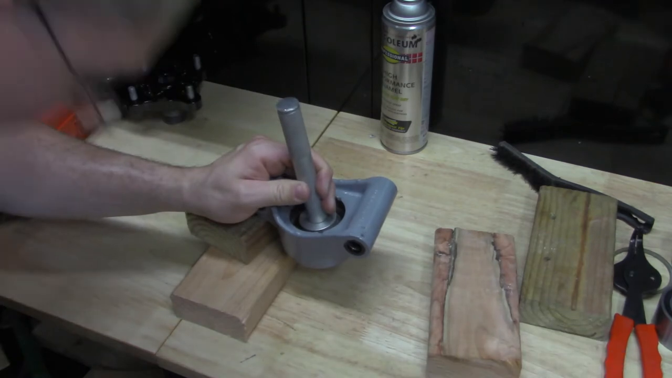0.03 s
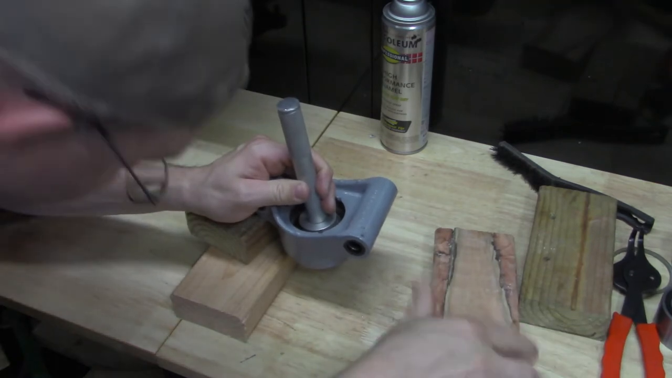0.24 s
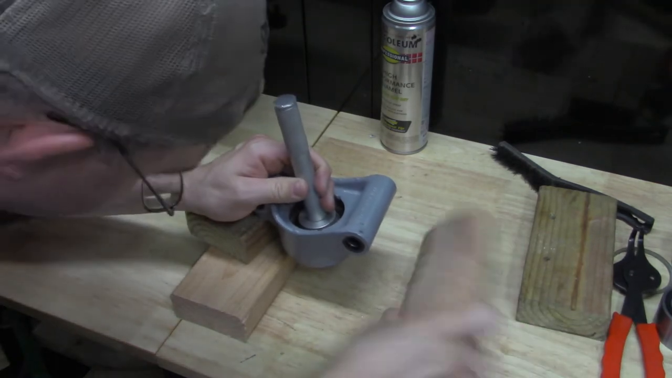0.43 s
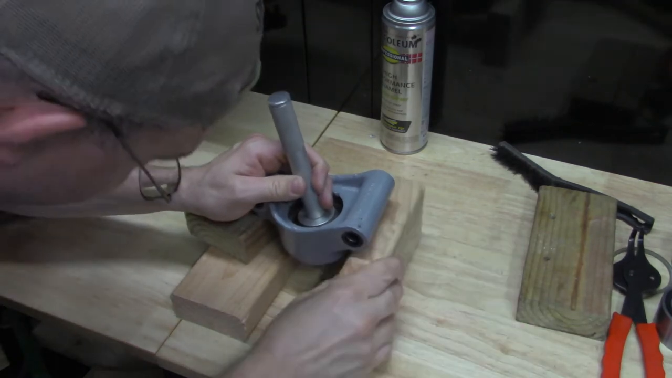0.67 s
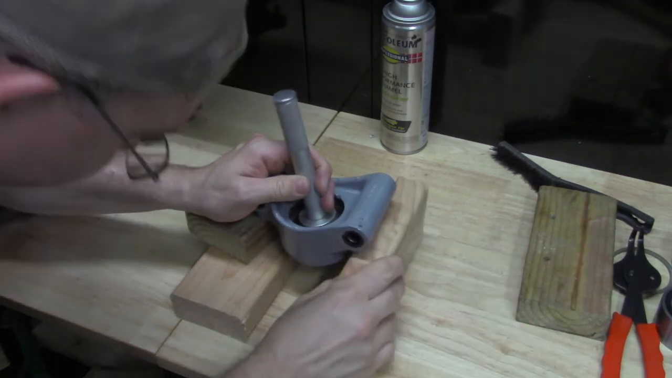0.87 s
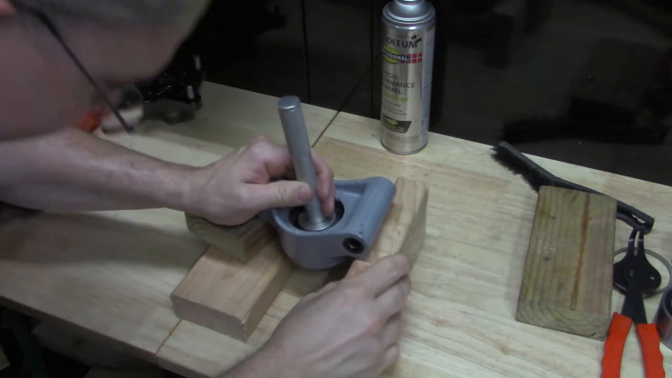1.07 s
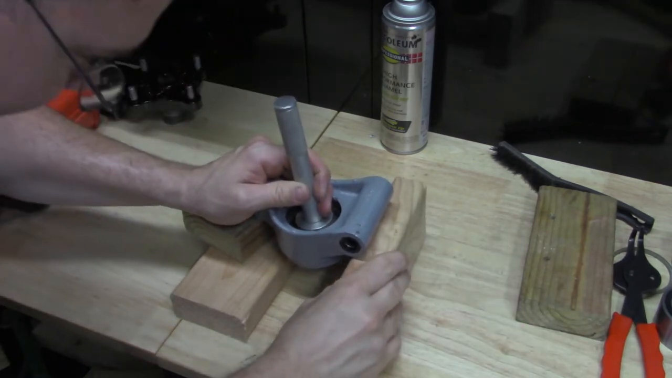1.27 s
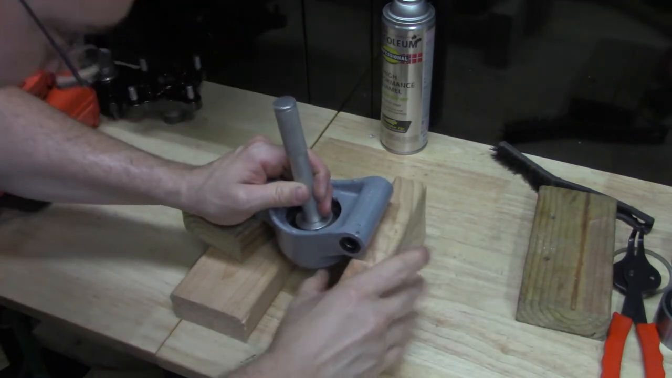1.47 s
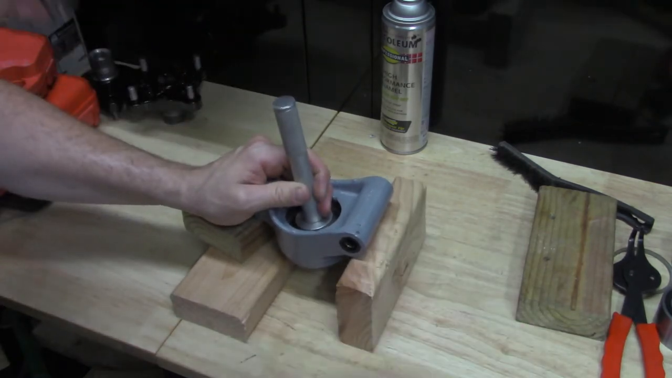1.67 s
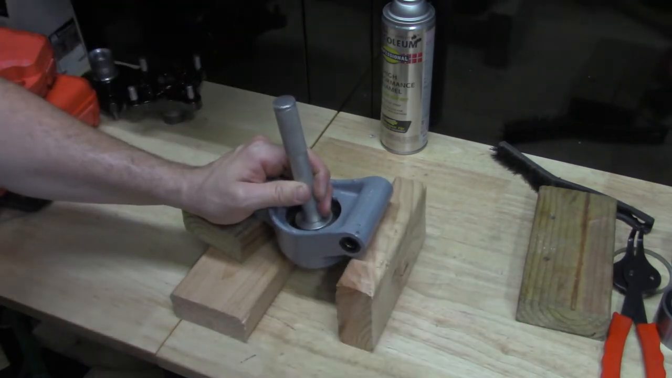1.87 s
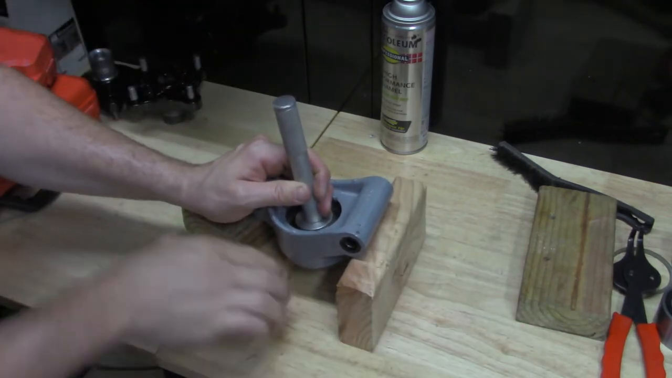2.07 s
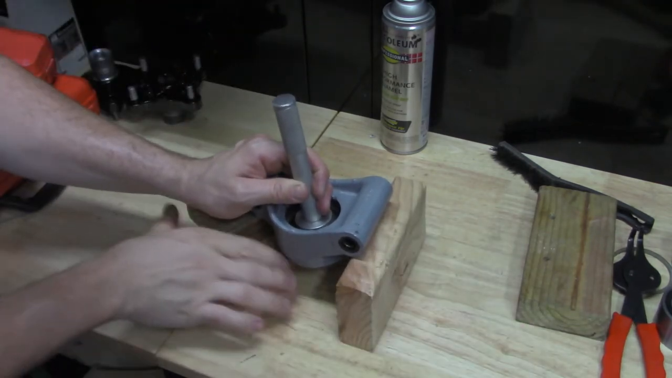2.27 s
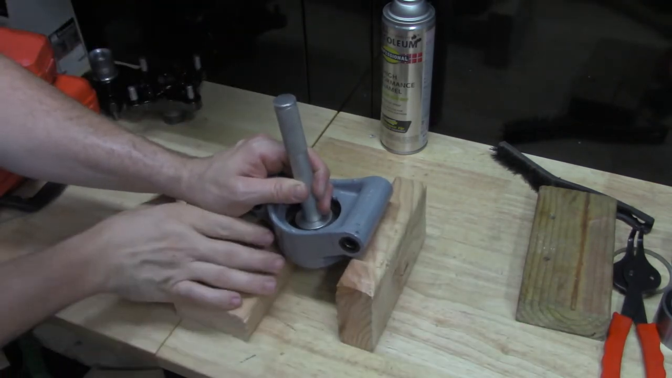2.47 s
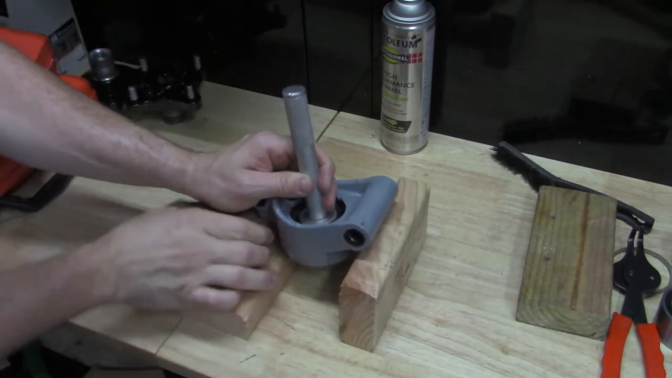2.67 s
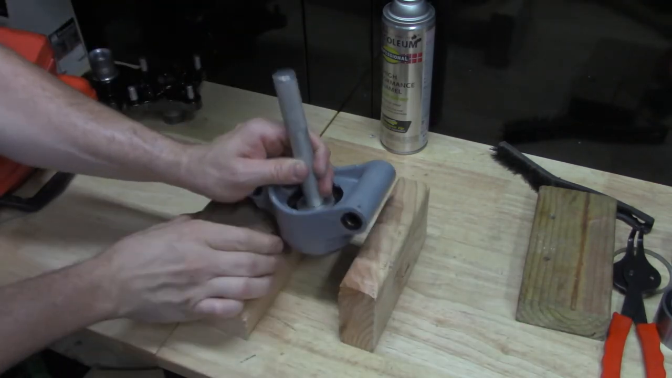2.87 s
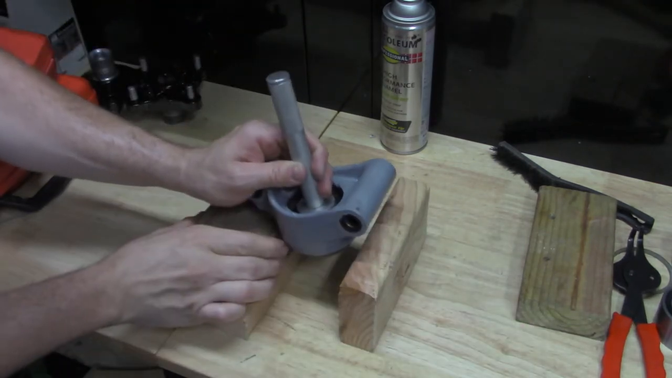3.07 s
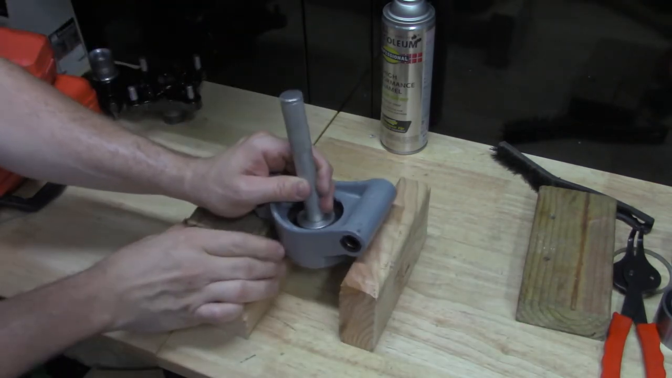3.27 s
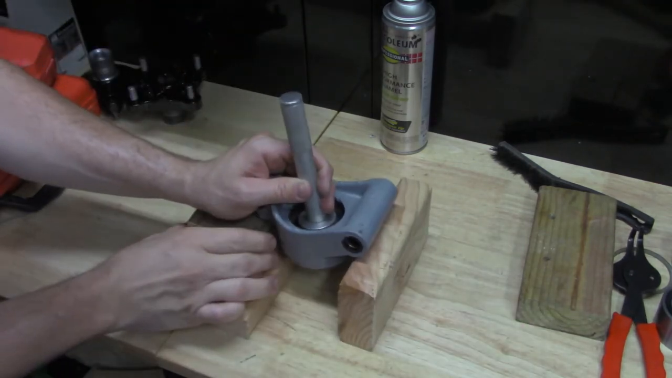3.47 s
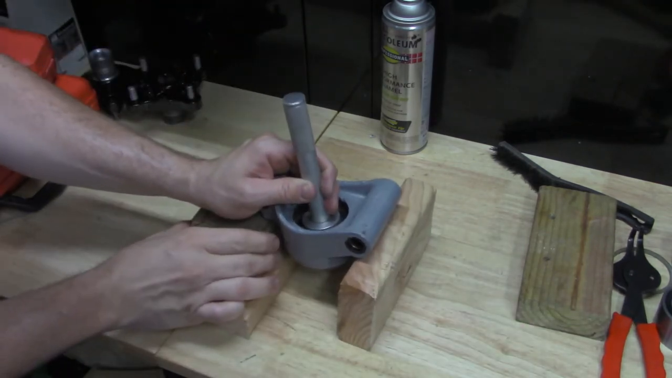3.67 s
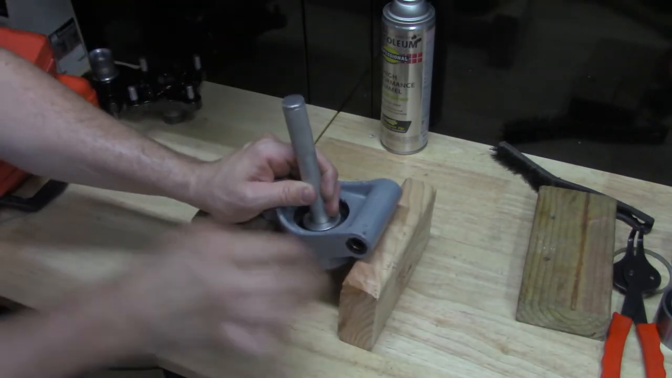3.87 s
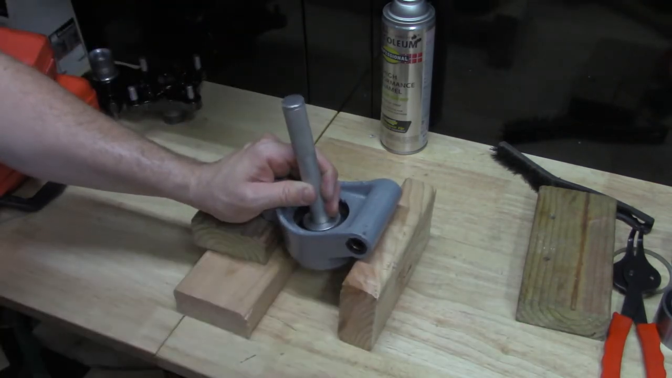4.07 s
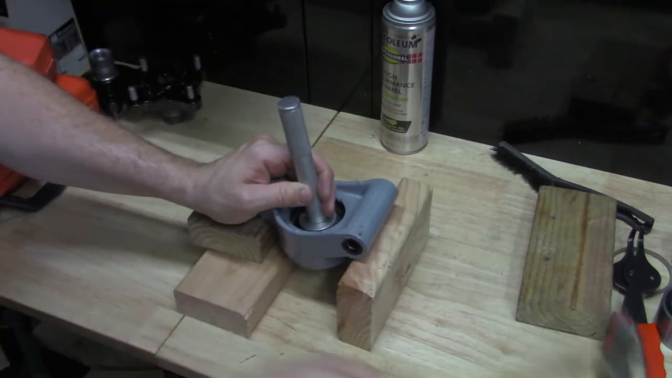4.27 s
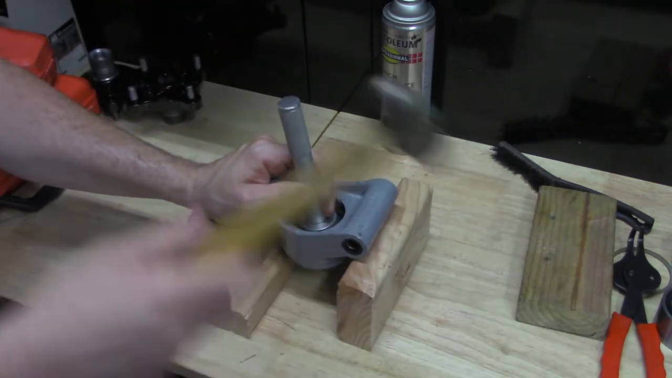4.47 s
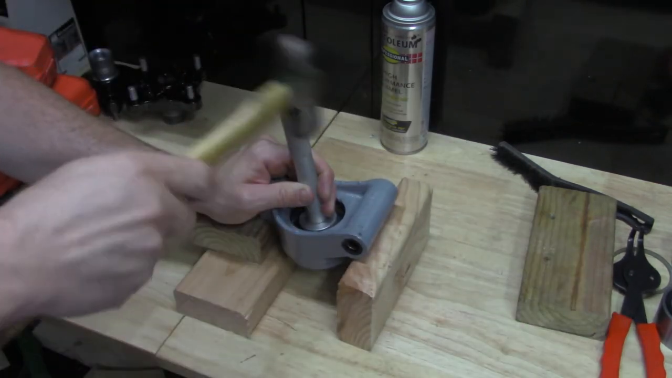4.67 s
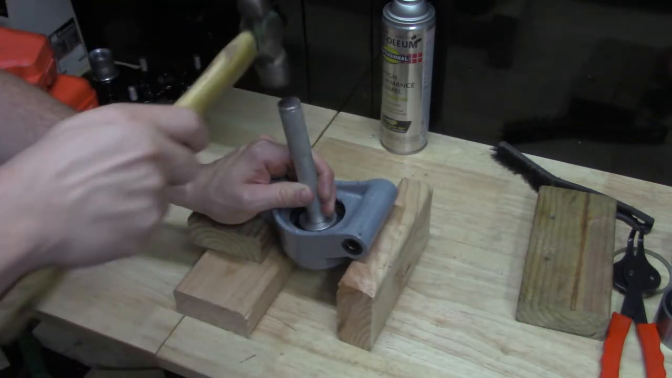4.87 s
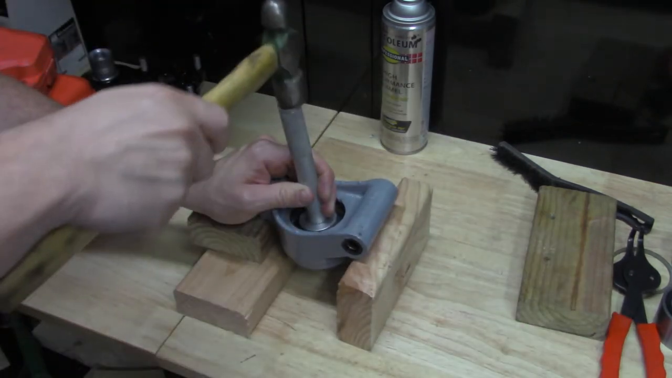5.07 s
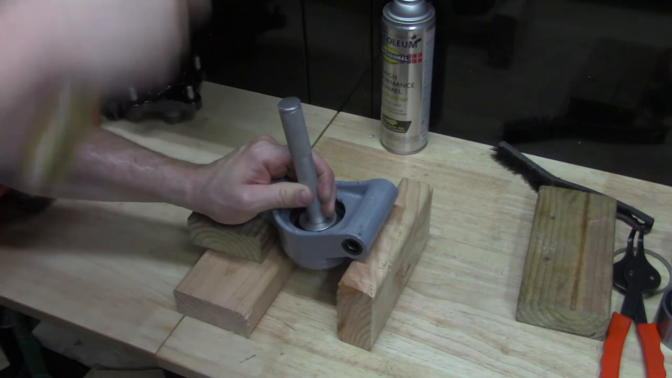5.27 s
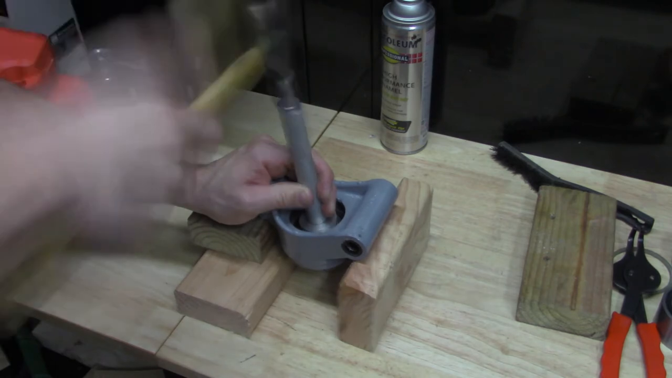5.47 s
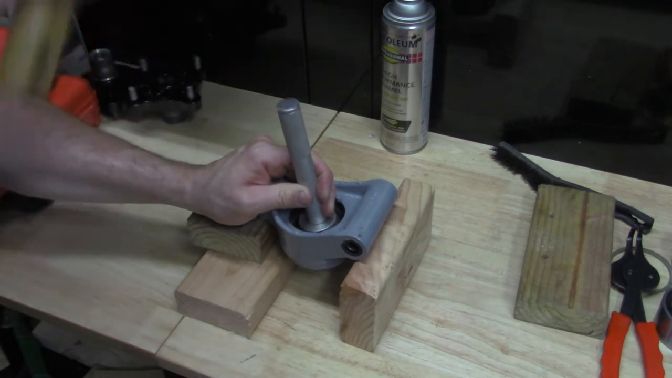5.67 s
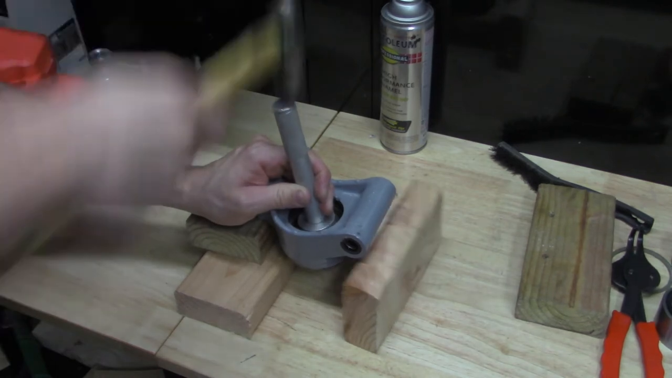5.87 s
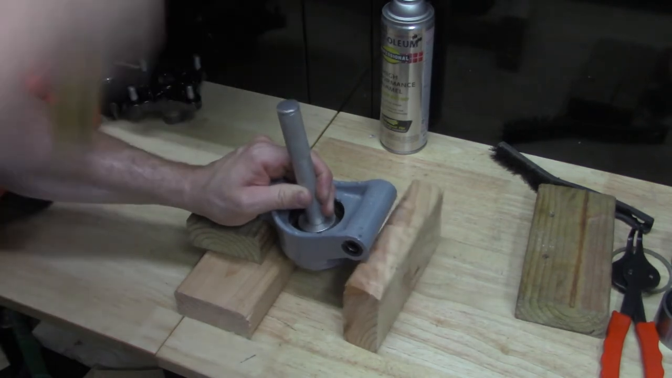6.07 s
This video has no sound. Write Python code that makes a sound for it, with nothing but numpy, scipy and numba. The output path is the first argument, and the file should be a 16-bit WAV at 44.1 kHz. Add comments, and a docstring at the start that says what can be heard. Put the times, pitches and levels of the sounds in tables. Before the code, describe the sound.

Close, slightly dull stereo, louder on the left: a rapid clatter of wood on a bench, hollow knocks, quiet rubbing, another sharp wooden clunk. After a near pause over airy hum, steel hits steel: one light tink, then two explosive blows, distorted and abruptly squashed, each followed by rattling wooden rebounds and a short, swelling workshop echo.

```python
"""Wooden blocks are set down, nudged and slid on a workbench to prop up a cast metal housing: filtered bursts and modes.
Then a hammer strikes a steel drift in its bearing, one light blow and two heavy: a noise crack plus ringing modes.
After each heavy blow the blocks hop and land again, ever sooner and weaker. Ventilation noise and hum run throughout.
The blows overload a nearby camera; its gain control ducks and, recovering, swells the workshop's echo."""
import sys
import numpy as np
from scipy import signal
from scipy.fft import rfft, irfft, next_fast_len
from scipy.io import wavfile
from scipy.ndimage import map_coordinates
from numba import njit

SR = 44100
rng = np.random.default_rng(int(sys.argv[2]) if len(sys.argv) > 2 else 0)


def file_out(sig):
    """Save sig as 16-bit WAV at sys.argv[1]."""
    # one column per channel
    cols = np.atleast_2d(sig).T
    # limit, then scale
    lim = np.clip(cols, -1, 1)
    pcm = np.round(lim * 32767).astype(np.int16)
    wavfile.write(sys.argv[1], SR, pcm)


N = 269892

# bench top with the blocks on it, modes: (frequency [Hz], level [dB], t60 [s])
BENCH_MODES = [(51.7, -22, 0.27), (117, -4, 0.2), (247, -18, 0.17), (388, -4, 0.088), (580, -3, 0.067),
               (738, -3.5, 0.065), (789, -3.5, 0.05), (987, -4, 0.062), (1134, -8, 0.14),
               (1175, -8.5, 0.045), (1480, -7.5, 0.065), (1465, -17, 0.043), (1900, -7.5, 0.012)]


def amp(db):
    """Decibels to gain."""
    return 10 ** (np.asarray(db) / 20)


def unit(x):
    """Scale to rms 1."""
    return x / np.sqrt(np.mean(x ** 2) + 1e-20)


def punch(x):
    """Scale to the energy of 10 ms at rms 1."""
    return x / np.sqrt(np.sum(x ** 2) * 100 / SR + 1e-20)


def along(points, hz):
    """Interpolate (Hz, value) points on a log frequency axis."""
    point_hz, value = np.transpose(points)
    return np.interp(np.log(hz + 1), np.log(point_hz), value)


def coloured(x, points):
    """Minimum-phase filter with the given (Hz, dB) gains, by folding the cepstrum."""
    half = next_fast_len(x.shape[-1] // 2 + 4096)
    gain = amp(along(points, np.fft.rfftfreq(2 * half, 1 / SR)))
    cepstrum = irfft(np.log(gain))
    cepstrum[1:half] *= 2
    cepstrum[half + 1:] = 0
    response = np.exp(rfft(cepstrum))
    return irfft(rfft(x, 2 * half) * response)[..., :x.shape[-1]]


def fade(t, t60):
    """Exponential decay of 60 dB in t60 seconds."""
    return np.exp(-np.log(1000) * t / t60)


def ring(modes, scatter_db, contact_s=0.00051):
    """Struck modes swell over the contact time and decay; mode levels scatter from strike to strike."""
    t = np.arange(SR // 2) / SR
    tones = np.zeros(len(t))
    for hz, db, t60 in modes:
        gain = amp(db + scatter_db * rng.normal())
        tones += gain * fade(t, t60) * np.sin(2 * np.pi * hz * t)
    return punch(tones * (1 - np.exp(-(t / contact_s) ** 2)))


def burst(spectrum, t60):
    """A contact spread in time by its path through the solid: random phases, smooth spectrum."""
    t = np.arange(SR // 2) / SR
    x = rng.standard_normal(len(t)) * fade(t, t60)
    for _ in range(6):  # alternate flat spectrum and short duration
        flat = irfft(np.exp(1j * np.angle(rfft(x))), len(t))
        x = flat * (t < t60)
    return punch(coloured(x, spectrum))


def diffuse(size):
    """Noise from all sides: alike at both microphones in the bass, nearly unrelated at the top."""
    # left-right likeness: (frequency [Hz], correlation [0-1])
    likeness = [(120, 0.97), (400, 0.24), (1200, 0.4), (3500, 0.45), (8000, 0.05)]
    a, b = rfft(rng.standard_normal((2, size)))
    correlation = np.clip(along(likeness, np.fft.rfftfreq(size, 1 / SR)), 0, 1)
    turn = np.arccos(correlation) / 2
    common, side = a * np.cos(turn), b * np.sin(turn)
    return irfft([common + side, common - side], size)


def workshop(x, echo_db, build_s=0.00053):
    """Direct sound plus a diffuse echo that builds up, then decays at its own rate in each band."""
    # reverberation time: (frequency [Hz], t60 [s])
    room_t60 = [(60, 1), (130, 0.26), (300, 0.61), (1000, 0.36), (3000, 0.29), (7000, 0.29), (14000, 0.2)]
    # echo spectrum: (frequency [Hz], level [dB])
    room_level = [(50, -3), (120, 4.5), (280, 2), (1000, 3.5), (5000, 0.5), (10000, 4), (15000, -12)]
    hz, t, z = signal.stft(diffuse(size=SR), SR, nperseg=256)
    t60 = along(room_t60, hz)[:, None]
    equal_energy = np.sqrt(2 * np.log(1000) / (t60 * SR))
    z = z * fade(t, t60) * amp(along(room_level, hz))[:, None] * equal_energy
    tail = signal.istft(z, SR, nperseg=256)[1][:, :SR]
    build_up = 1 - np.exp(-(np.arange(SR) / SR / build_s) ** 2)
    response = amp(echo_db) * tail * build_up
    response[:, 0] += 1  # direct sound
    return signal.fftconvolve(x[None], response, axes=1)


def add(track, s, x):
    """Mix x into the track at time s [s]."""
    part = track[:, max(round(s * SR), 0):][:, :x.shape[1]]
    part += x[:, :part.shape[1]]


def hammer():
    """Steel cracks on steel; the drift rings and drives the housing into the bench and its frame."""
    # hammer on the drift: (time [s], level [dB], housing ring [dB])
    blow_list = [(4.936, -3, -26), (5.47, 22, -8), (5.8132, 22, -12)]
    # steel on steel, spectrum: (frequency [Hz], level [dB per Hz])
    crack_spectrum = [(30, -7.5), (120, 3.5), (300, 0), (800, 1), (1500, 4.5), (3200, 1.5), (4300, -3),
                      (8300, -11), (9300, -13.5), (11000, -23), (16000, -15)]
    # steel drift held in the fingers, modes: (frequency [Hz], level [dB], t60 [s])
    drift_modes = [(2490, 15, 0.041), (3100, -5, .05), (4390, 10, 0.12), (4400, 7, 0.082), (4750, -1, 0.08),
                   (6050, 10, 0.023), (8650, -15, .05)]
    # cast housing and bearing, modes: (frequency [Hz], level [dB], t60 [s])
    housing_modes = [(1113, -9.5, 0.22), (1440, -11, 0.046), (1860, -17, 0.049), (2010, -18, 0.058),
                     (2290, 4, 0.009), (2750, -11, 0.022), (3123, 9.5, 0.016), (3486, 6, 0.02),
                     (7220, -7, 0.028), (8360, -15, 0.013)]
    # bench frame, shaken only by the hammer, modes: (frequency [Hz], level [dB], t60 [s])
    frame_modes = [(55.5, -8, 0.32), (97.8, -1, 0.63)]
    weight_db, bench_db, frame_db = 2.5, -9, -20.5
    bright_db, bright_slope = -4.5, 0.091  # top of the crack at level 0; harder is sharper [dB per dB]
    drift_db, drift_slope = -11, -0.54  # drift ring at level 0; harder seats and damps it [dB per dB]
    out = np.zeros((2, N))
    for s, db, housing_db in blow_list:
        tilt = [(600, weight_db), (1400, 0), (6500, 0.0082), (13000, bright_db + bright_slope * db)]
        blow = coloured(burst(crack_spectrum, t60=0.02), tilt)
        blow += amp(drift_db + drift_slope * db) * ring(drift_modes, scatter_db=1)
        blow += amp(housing_db) * ring(housing_modes, scatter_db=1)
        blow += amp(bench_db) * ring(BENCH_MODES, scatter_db=1)
        blow += amp(frame_db) * ring(frame_modes, scatter_db=4, contact_s=0.0025)
        add(out, s, workshop(amp(db) * blow, echo_db=-2.0, build_s=0.00057))
    return out


def knock(hardness_db, bass_db, note_hz, note_db):
    """One contact of wood on the bench: a clack, the bench's modes and the block's own note."""
    # wood on wood, spectrum: (frequency [Hz], level [dB per Hz])
    clack_spectrum = [(30, -15.5), (110, 1), (300, -2.5), (1000, -2.5), (2000, -12.5), (4000, -24),
                      (8000, -39.5), (15000, -83)]
    tilt = [(110, bass_db), (300, 4.5), (700, 3.5), (2000, hardness_db), (6000, hardness_db), (14000, 4)]
    wood = amp(-6.5) * ring(BENCH_MODES, scatter_db=0.0) + burst(clack_spectrum, t60=0.033)
    wood = punch(coloured(wood, tilt))
    note = ring([(note_hz, 0, 0.02)], scatter_db=0)  # t60 0.02 s
    return punch(wood + amp(note_db) * note)


def blocks():
    """Flat landings are dull and hollow, edge landings bright, gentle nudges mostly thud."""
    # wood set down or nudged: (time [s], level [dB], contact hardness [dB], block note [Hz], echo [dB])
    knock_list = [(.002, -3, -2.5, 1160, -2), (.007, -3.5, 6, 1720, 0.5), (.078, -3.5, 6.5, 1615, 1.5),
                  (.118, -4.5, 15.5, 1120, -1), (.124, -7.5, 7.5, 660, 1.5), (.166, -9.5, -1, 402, -1),
                  (.195, -11.5, -7, 415, -15), (0.283, -23, -1, 420, 6.5), (.506, -7, -3, 260, 0.5),
                  (.532, -19, -1, 745, -2.5), (.58, -10.5, 3, 2176, -8), (.664, -6.5, -8, 576, -11),
                  (.923, -14.5, -9.5, 280, -4.5), (.955, -20, -4, 810, -10), (1.75, -31, -4, 270, -2.5),
                  (2.619, -32.5, -16, 400, 0), (2.675, -28.5, -19, 550, -2.5), (3.19, -18.5, -6, 586, 2),
                  (3.221, -2.5, -10, 265, -5), (3.226, -8, 6.5, 440, -1), (3.59, -31.5, -22, 386, 0.5),
                  (4.05, -31, -24, 129, 2), (4.127, -30.5, -9, 920, -2.5), (4.1734, -12, -0.5, 540, -5),
                  (4.209, -25, 8, 1200, -6)]
    bass_db, bass_slope = -5.5, -0.62  # thud at level 0; gentler push more than click [dB per dB]
    note_db, note_slope = -5, -0.27  # note at hardness 0; hard edges excite it less [dB per dB]
    out = np.zeros((2, N))
    for s, db, hardness_db, note_hz, echo_db in knock_list:
        thud_db = bass_db + bass_slope * db
        contact = knock(hardness_db, thud_db, note_hz, note_db + note_slope * hardness_db)
        add(out, s, workshop(amp(db) * contact, echo_db))
    return out


def jolts(count=3):
    """Things thrown up by a heavy blow land and rebound, ever sooner and weaker."""
    # landings after the heavy blows: (first landing [s], level [dB], thud [dB])
    landings = [(5.565, 0, -2.5), (5.976, -4.5, 13)]
    hop_s, hop_shrink, hop_loss_db = .055, .7, 5  # first rebound, ratio of each to the last, loss a rebound
    out = np.zeros((2, N))
    for s, db, thud_db in landings:
        for k in range(count):
            contact = knock(hardness_db=-13.5, bass_db=thud_db, note_hz=620, note_db=-8)
            add(out, s, workshop(amp(db - hop_loss_db * k) * contact, echo_db=-5))
            s = s + hop_s * hop_shrink ** k
    return out


def scuffs(rough=0.26):
    """Wood and fingers slide: grain catches in tiny slips, hissing and rumbling the bench."""
    # strokes, relative levels: (middle [s], half length [s], hiss [dB], rumble [dB])
    strokes = [(0.448, 0.028, -38, -31.5), (0.654, .03, -40, -51), (0.95, 0.018, -43.5, -63),
               (2.158, 0.046, -50.5, -44), (2.238, 0.017, -48.5, -70), (2.392, 0.0089, -59, -74),
               (2.65, 0.39, -49.5, -40.5), (4.12, 0.078, -51, -40.5)]
    # hiss spectrum: (frequency [Hz], level [dB per Hz])
    rasp_spectrum = [(300, -25), (1500, 10), (4000, 10), (8000, 0), (11000, -13), (16000, -21)]
    # rumble spectrum: (frequency [Hz], level [dB per Hz])
    rumble_spectrum = [(30, -6), (130, 13.5), (550, -8), (1100, -8), (2500, -41), (6000, -31),
                       (16000, -110)]
    t = np.arange(N) / SR
    hiss, rumble = np.zeros(N), np.zeros(N)
    for s, half_length_s, hiss_db, rumble_db in strokes:
        stroke = np.exp(-((t - s) / half_length_s) ** 2)
        hiss += amp(hiss_db) * stroke
        rumble += amp(rumble_db) * stroke
    slips = rng.standard_normal((2, N)) * np.exp(rough * rng.standard_normal((2, N)))
    rubbing = hiss * unit(coloured(slips[0], rasp_spectrum))
    rubbing += rumble * unit(coloured(slips[1], rumble_spectrum))
    return workshop(amp(-1.0) * rubbing, echo_db=-6.5)[:, :N]


def background(air_db=-43, hum_db=-47, hum_hz=122, waver=0.14):
    """Steady diffuse ventilation noise with a hum wavering in level and phase."""
    # ventilation spectrum: (frequency [Hz], level [dB per Hz])
    air_spectrum = [(25, -16.5), (60, -4.5), (100, -9.5), (135, -4.5), (180, -13), (215, -22.5),
                    (260, -9.5), (330, -20.5), (600, -19.5), (2000, -22), (4500, -29.5), (8000, -39),
                    (11000, -42), (15800, -42)]
    t = np.arange(N) / SR
    # smooth random curves, 18 points a second
    in_phase, quadrature = (map_coordinates(rng.standard_normal(N // 100), [t * 18]) for _ in range(2))
    wavering = 1 + waver * (in_phase + 1j * quadrature)
    hum = unit(np.real(wavering * np.exp(2j * np.pi * hum_hz * t)))
    air = unit(coloured(diffuse(size=N), air_spectrum))
    air = coloured(air, [(100, 1.7), (400, 3.5), (3000, 1.55), (9000, -3.0)])  # air_db excludes this lift
    return amp(air_db) * air + amp(hum_db) * hum


def scene():
    """Everything at the bench; the drift stands a little more to the right than the blocks."""
    # right microphone, facing away from the bench: (frequency [Hz], gain [dB])
    shade = [(30, 3.5), (110, -5), (300, -8), (600, -11), (1500, -11), (3500, -8.5), (6000, -3.5),
             (10000, -2)]
    left, right = blocks() + jolts() + hammer() * amp([[0], [1.5]]) + scuffs() + background()
    return np.array([left, coloured(right, shade)])


@njit
def ducking(excess_db, attack_s, slew_db_per_s, release_db_per_s):
    """Gain reduction [dB]: closes at a limited slew, lets go at a steady rate."""
    cut, out = 0.0, np.zeros(len(excess_db))
    for i in range(len(excess_db)):
        if excess_db[i] > cut:
            cut += min((excess_db[i] - cut) / attack_s, slew_db_per_s) / SR
        else:
            cut = max(cut - release_db_per_s / SR, 0.0)
        out[i] = cut
    return out


def record(dry, limit_db=-5, attack_s=0.0011, slew_db_per_s=12000, recovery_db_per_s=190, ceiling=0.87):
    """The capsules overload on one side, gain control ducks too late, and the first milliseconds clip."""
    # the camera's dull top octave: (frequency [Hz], gain [dB])
    dull_top = [(8000, -0.5), (10500, -1), (13000, -2.5), (16000, -7)]
    rail, top_hz = amp(15), 15800
    bent = np.where(dry < 0, rail * np.tanh(dry / rail), dry)
    bent = signal.sosfilt(signal.butter(1, 25, "high", fs=SR, output="sos"), bent)
    peak = np.abs(bent).max(axis=0)  # both channels duck together
    excess_db = 20 * np.log10(peak + 1e-9) - limit_db
    ducked = bent * amp(-ducking(excess_db, attack_s, slew_db_per_s, recovery_db_per_s))
    clipped = coloured(np.clip(ducked, -ceiling, ceiling), dull_top)
    return signal.sosfilt(signal.ellip(10, .1, 80, top_hz, fs=SR, output="sos"), clipped)


dry = scene()
out = record(dry)
file_out(out)
```